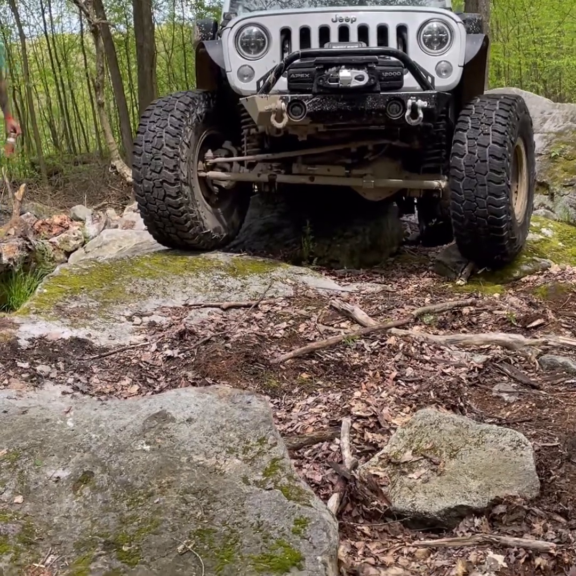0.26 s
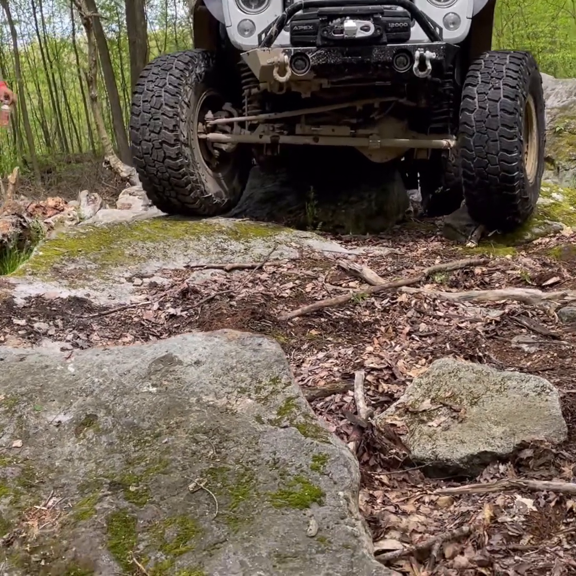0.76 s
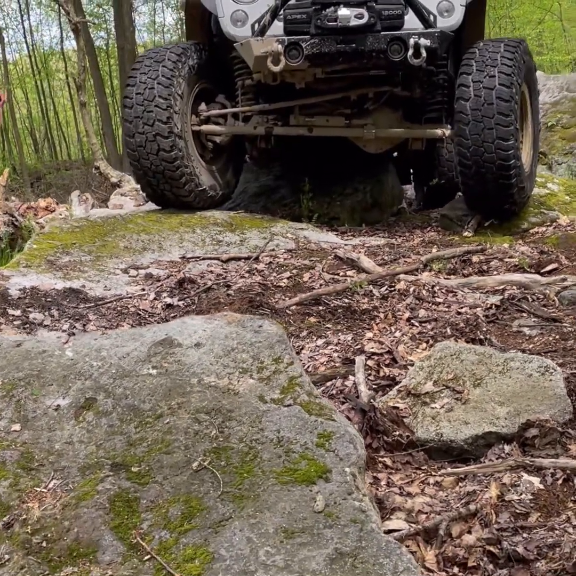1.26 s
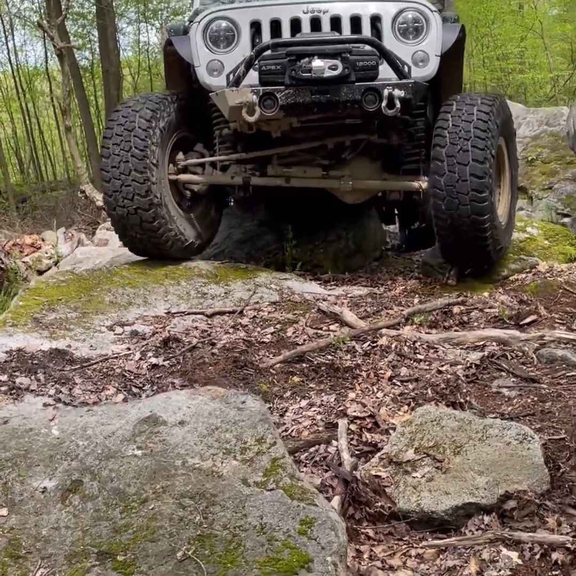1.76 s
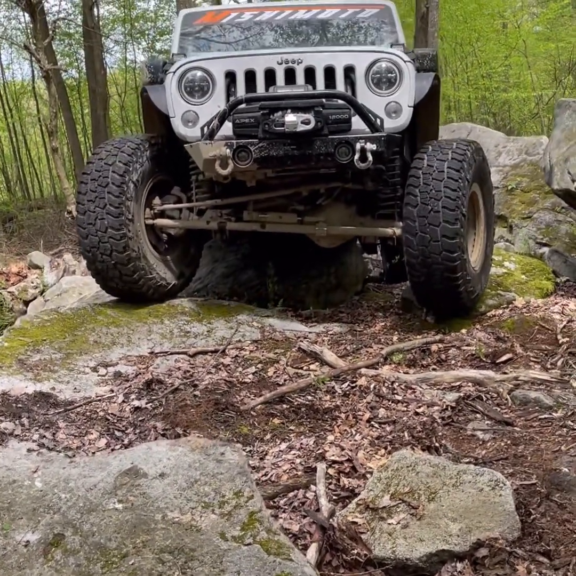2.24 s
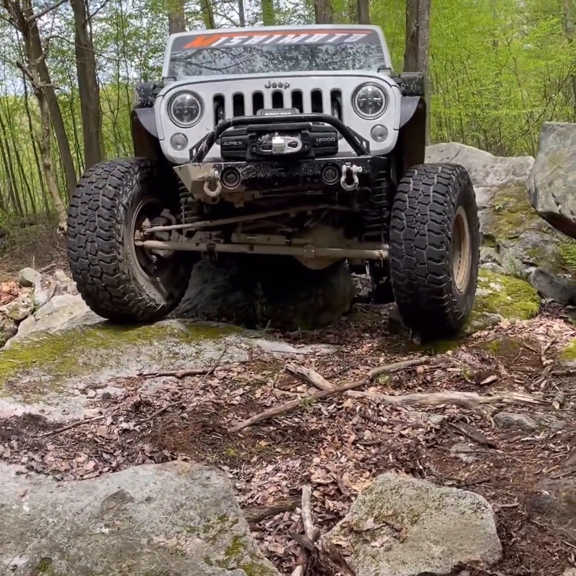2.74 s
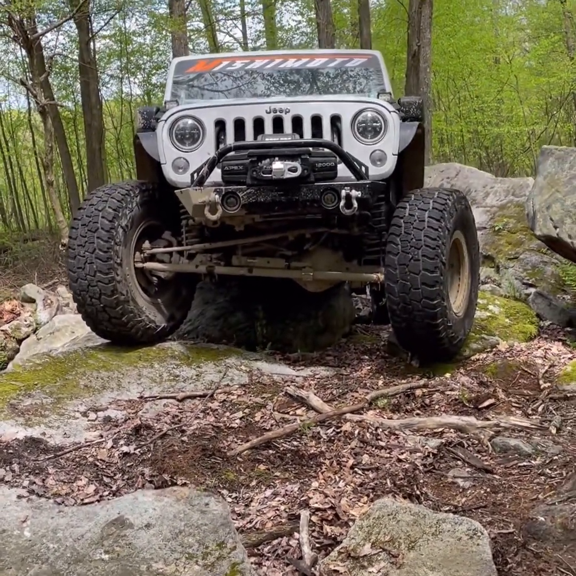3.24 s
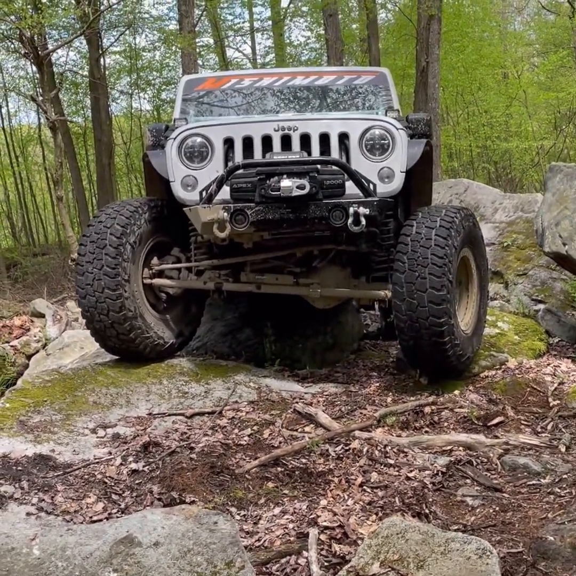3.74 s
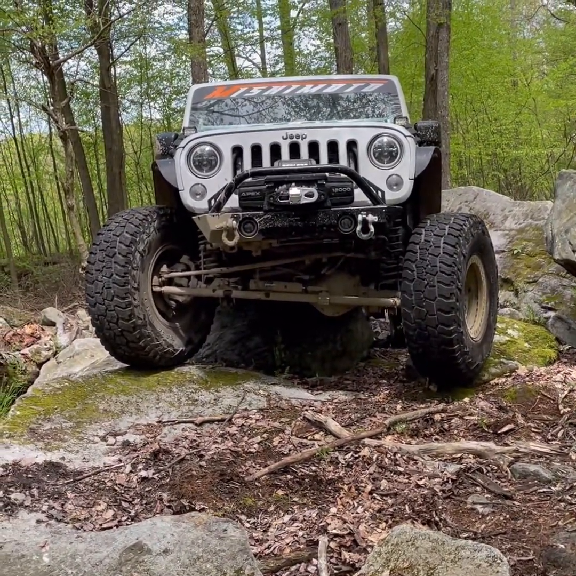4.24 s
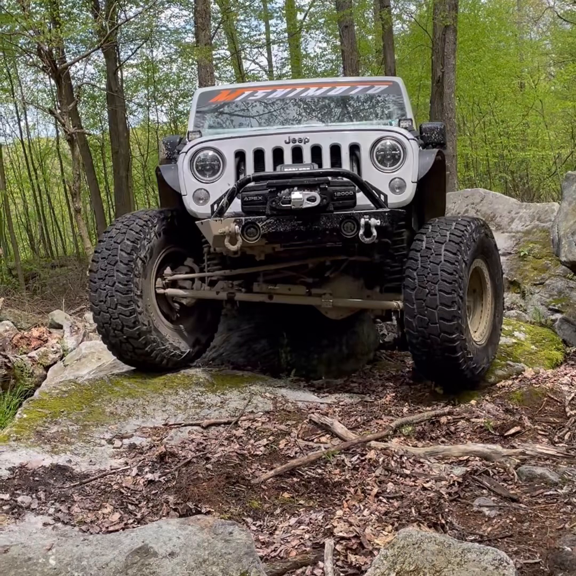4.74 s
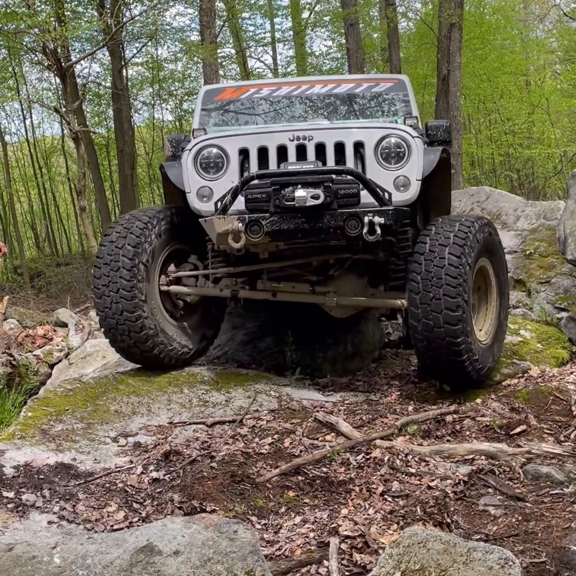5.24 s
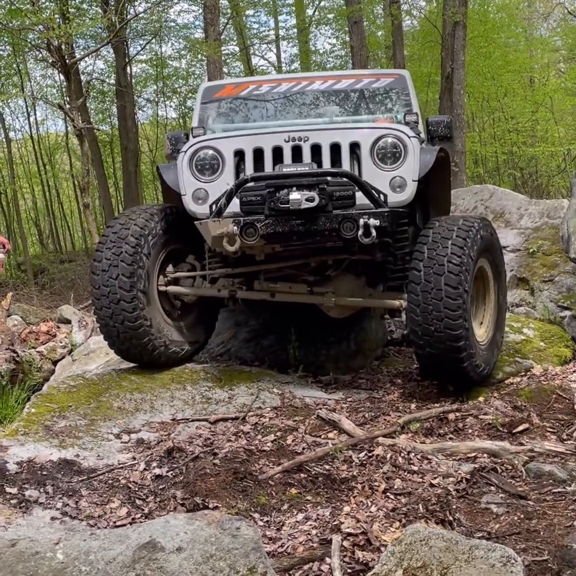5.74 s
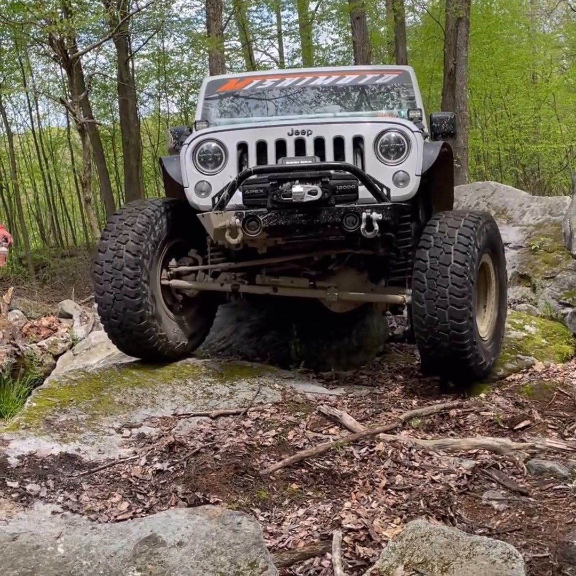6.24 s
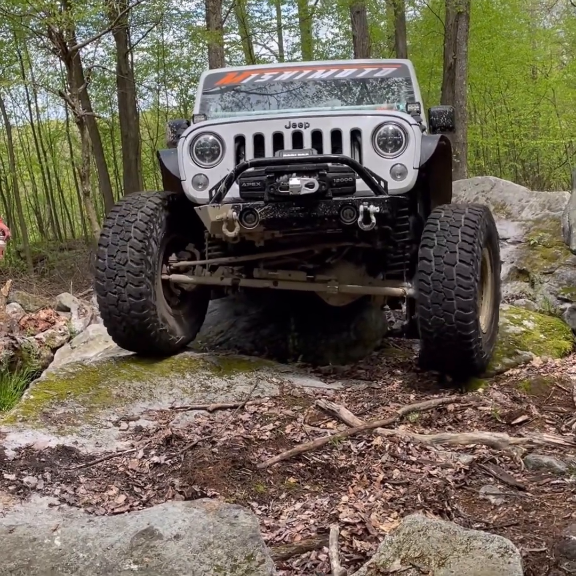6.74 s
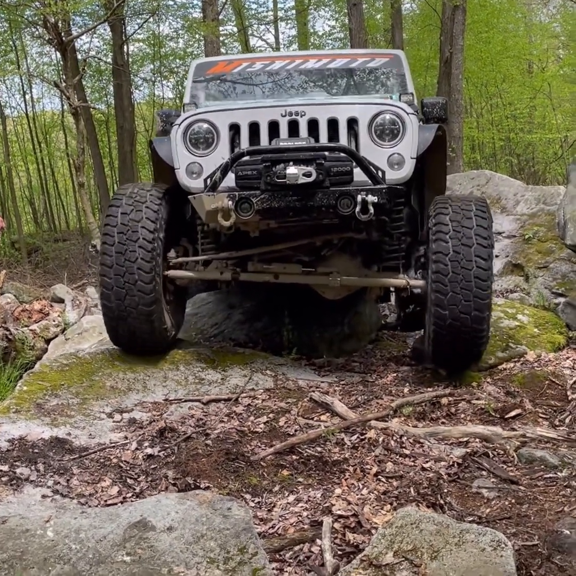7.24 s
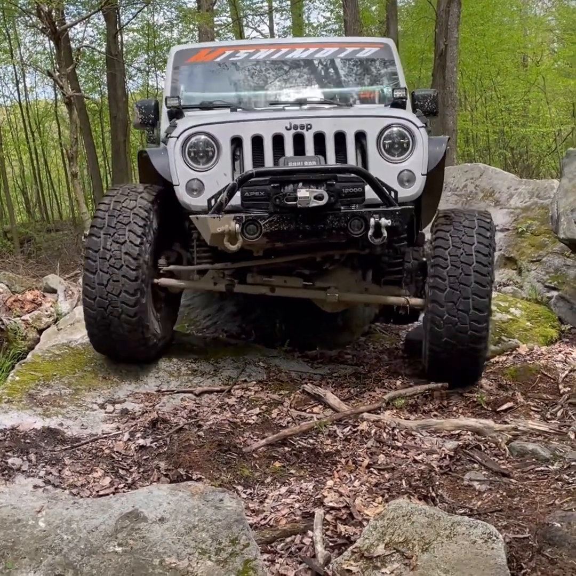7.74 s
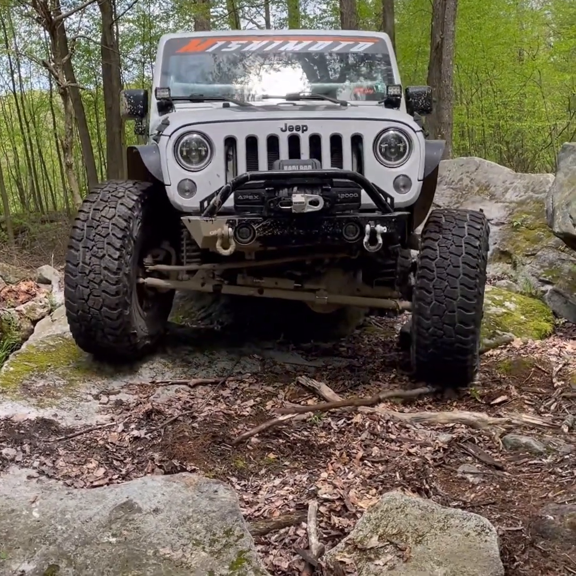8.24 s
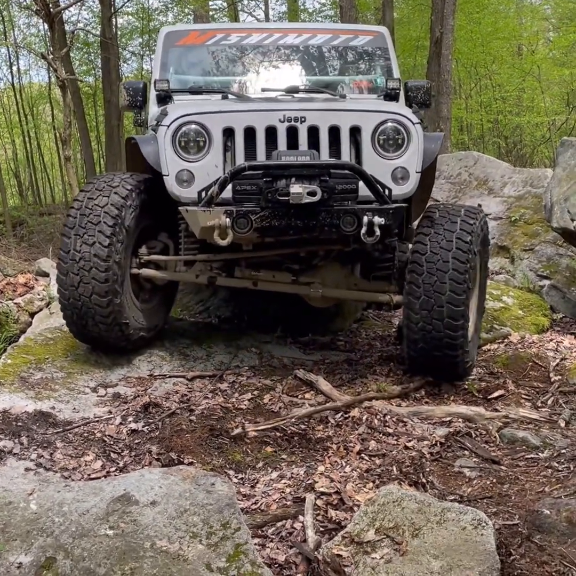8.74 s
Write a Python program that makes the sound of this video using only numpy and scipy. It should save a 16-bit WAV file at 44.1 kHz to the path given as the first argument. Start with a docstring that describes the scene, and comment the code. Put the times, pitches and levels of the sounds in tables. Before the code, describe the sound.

A low, throbbing engine with whirring fan and light clatter runs throughout, heard in the open with only a thin scattered tail from trees and rocks. Braking comes first: hollow groans, gritty rasps, sharp squeals. Dull tyre thuds cluster in the middle. Later the throttle surges, tyres scrape in quick pulses and pop off the slab, twigs snap, and rubber creaks.

```python
"""An off-road vehicle's six-cylinder engine works from just above idle as it crawls over rock slabs on a leafy trail.
The engine is sines at multiples of the firing rate, gas puffs, clattering panels and a cooling fan's two tones.
Dragging brakes are rough friction noise in resonances, and their squeals are short gliding tones.
Tyres and axles thud as struck modes; tread blocks scuff and pop on stone, and late on the rubber creaks.
Leaves and twigs crackle as random grains; trees and rocks add a thin scattered tail."""
import sys
import numpy as np
from scipy import signal
from scipy.fft import rfft, irfft
from scipy.io import wavfile
from scipy.ndimage import uniform_filter1d

SR = 44100
rng = np.random.default_rng(int(sys.argv[2]) if len(sys.argv) > 2 else 0)


def store_wav(level_fs):
    """Save 16-bit WAV to argv[1]."""
    pcm = np.round(np.clip(np.atleast_2d(level_fs), -1, 1) * 32767)
    wavfile.write(sys.argv[1], SR, pcm.T.astype(np.int16))


N = 396018
TIME = np.arange(N) / SR
FREQS = np.arange(N // 2 + 1) * SR / N

# spectrum of tread rubber and grit on stone: (frequency [Hz], relative level [dB])
SCUFF_COLOUR = [(160, 1), (300, 8), (450, 4.5), (560, 3.5), (760, -1.5), (950, 7), (1200, -6), (1600, -2.5),
                (2200, -17.5), (3500, -18), (5000, -25), (9000, -63)]


def from_db(db):
    """Decibels to gain."""
    return 10 ** (np.asarray(db) / 20)


def rms_one(x):
    """Scale to unit power."""
    return x / np.sqrt(np.mean(x ** 2) + 1e-20)


def in_time(rows):
    """Each column of a curve table at every sample."""
    s, *columns = np.transpose(rows)
    return [np.interp(TIME, s, column) for column in columns]


def at_hz(points):
    """Read a table over log frequency at every spectral bin."""
    hz, value = np.transpose(points)
    return np.interp(np.log(np.maximum(FREQS, 1)), np.log(hz), value)


def coloured(x, spectrum):
    """Give x a spectrum that falls away steeply beyond its ends, at unit power."""
    low_skirt = np.minimum(1, FREQS / spectrum[0][0]) ** 4
    high_skirt = np.maximum(1, FREQS / spectrum[-1][0]) ** 4
    return rms_one(irfft(rfft(x) * from_db(at_hz(spectrum)) * low_skirt / high_skirt, N))


def drift(rate):
    """Slow random wander of spread 1, made at a fortieth of the sample rate; a higher rate [Hz] wanders faster."""
    r = np.exp(-80 * np.pi * rate / SR)
    noise = rng.standard_normal(N // 40 + 2002)
    slow = signal.lfilter([1], [1, -2 * r, r * r], noise)[2000:]  # skip the filter's settling
    return np.interp(np.arange(N) / 40, np.arange(len(slow)), rms_one(slow))


def resonate(x, modes, wander_db=0):
    """Parallel resonances; each one's dB is its share of the power, and may swell and fade by itself."""
    out = 0
    for hz, width, db in modes:
        r = np.exp(-np.pi * width / SR)
        poles = [1, -2 * r * np.cos(2 * np.pi * hz / SR), r * r]
        ringing = signal.lfilter([1, 0, -1], poles, x + 1e-18)
        out = out + from_db(db + wander_db * drift(23)) * rms_one(ringing)
    return rms_one(out)


def grains(per_s, spread_db):
    """Random tiny contacts, mostly small and a few large."""
    sizes = from_db(spread_db * np.minimum(rng.exponential(1, N), 4)) * rng.choice([-1, 1], N)
    return rms_one(sizes * (rng.random(N) < per_s / SR))


def held(start, length, rise, fall):
    """Attack, hold and release."""
    age = np.maximum(TIME - start, 0)
    release = np.exp(-np.minimum(np.maximum(age - length, 0) / fall, 20))
    return (1 - np.exp(-age / rise)) * release


def swell(s, half, squareness=2.04):
    """A rise, a short hold and a fall around one moment."""
    return np.exp(-.5 * np.minimum(np.abs(TIME - s) / half, 4) ** squareness)


def near(hz, centre_hz, width_hz):
    """Gain of a resonance for a tone passing through it."""
    return 1 / np.hypot(1, 2 * (hz - centre_hz) / width_hz)


def damped(age, hz, t60, db):
    """One struck mode dying away by 60 dB in t60 seconds."""
    return from_db(db - 60 * age / t60) * np.sin(2 * np.pi * hz * age)


def slips(per_s, uneven):
    """Stick and slip: an uneven train of unit clicks."""
    rate = per_s * np.exp(uneven * drift(90))
    return np.diff(np.floor(np.cumsum(rate) / SR), prepend=0)


def engine_load():
    """Each press builds quickly, sags as the engine catches up, and dies away once the pedal is lifted."""
    # presses of the throttle: (start [s], length [s], firing-note level before the sag [dB])
    presses = [(0.505, 0.3, -45), (1.965, 0.41, -20.5), (2.8, 1.5, -37), (4.7, 0.66, -46),
               (5.495, 0.25, -19.5), (7.09, 0.31, -17.5), (7.95, 0.81, -29)]
    rise_s, sag_db_per_s, fall_db_per_s = 0.24, 3.5, 19.5
    load = from_db(-57)  # throttle closed
    for s, length, db in presses:
        age = np.maximum(TIME - s, 0)
        sag_db = sag_db_per_s * np.minimum(age, length)
        fall_db = fall_db_per_s * np.maximum(age - length, 0)
        load = load + from_db(db - sag_db - fall_db) * np.minimum(age / rise_s, 1) ** 2
    return load


def exhaust(turn, firing, drone_hz=122, drone_width_hz=42, pipe_hz=240, pipe_width_hz=35, rough=0.14):
    """Firing orders grow with load or drone as they cross pipe resonances; unequal banks add order 1.5."""
    # exhaust drone before its resonance: (time [s], level [dB])
    drone_curve = [(0, -44), (.45, -39.5), (.85, -30.5), (.95, -37.5), (1.24, -43), (1.3, -54), (2.0, -43),
                   (2.2, -35.5), (2.8, -43), (3.55, -35.5), (3.75, -40), (5.2, -37.5), (5.6, -35.5),
                   (6.5, -34), (6.8, -46), (7.1, -39), (7.28, -22.5), (7.55, -41), (8.06, -51),
                   (8.25, -35.5), (8.6, -30), (8.85, -39), (8.98, -42)]
    # the engine lopes as it labours against a ledge: (start [s], length [s], level of order 1.5 [dB])
    lopes = [(4.683, 0.82, -29)]
    first = engine_load()
    drone = from_db(in_time(drone_curve)[0])
    banks = from_db(-50)
    for s, length, db in lopes:
        banks = banks + from_db(db) * held(s, length, rise=0.032, fall=0.044)
    second = drone * near(2 * firing, drone_hz, drone_width_hz) ** 2 + from_db(-22) * first
    third = drone * near(3 * firing, drone_hz, drone_width_hz) ** 2
    out = 0
    for order, gain in ((1, first), (3 / 2, banks), (2, second), (3, third)):
        out = out + gain * (1 + rough * drift(3.7)) * np.sin(2 * np.pi * order * turn)
    for order in range(4, 8):
        pipe = from_db(-15) * near(order * firing, pipe_hz, pipe_width_hz)
        gain = first * pipe * (4 / order) ** 3
        out = out + gain * (1 + rough * drift(4.8)) * np.sin(2 * np.pi * order * turn)
    return np.sqrt(2) * out


def chug(turn, gain_db=-33):
    """Every firing sends a short puff of gas down the pipe, stronger under load."""
    gate = rms_one(np.exp(2 * np.cos(2 * np.pi * turn)))
    # (frequency [Hz], relative level [dB])
    gas = coloured(rng.standard_normal(N), [(110, 13), (250, 2.5), (450, -2), (900, -10)])
    return from_db(gain_db) * np.sqrt(engine_load()) * gate * gas


def fan(blade_hz=201.5, waver=0.002):
    """The electric cooling fan's blade tone and its fluttering octave."""
    # (time [s], blade tone level [dB RMS], octave level [dB RMS])
    fan_levels = [(0, -42, -55), (.6, -44.5, -51.5), (1.3, -53, -55), (2.0, -44, -46.5),
                  (2.8, -41.5, -47.5), (4.5, -41, -51), (6.3, -41.5, -48.5), (8.3, -39.5, -51),
                  (8.98, -39, -52)]
    tone_db, octave_db = in_time(fan_levels)
    phase = 2 * np.pi * np.cumsum(blade_hz * (1 + waver * drift(2.7))) / SR
    tone = from_db(tone_db) * np.sin(phase) * (1 + 0.042 * drift(15))
    octave = from_db(octave_db) * np.sin(2 * phase) * (1 + 0.37 * drift(15))
    return np.sqrt(2) * (tone + octave)


def engine_bay(turn, level_db=-41, air_db=-1, ring_db=-5, throb=0.26, flicker_db=0.82):
    """Fan air, and valve clatter that pulses with the firings and rings in the panels; both flicker slightly."""
    # spectrum of the air: (frequency [Hz], relative level [dB])
    air_colour = [(280, -6.5), (400, 1), (510, -6.5), (600, -7.5), (980, -5.5), (1500, -15.5), (2100, -17),
                  (3000, -19.5), (5000, -39), (6300, -22.5), (8000, -45), (15500, -41)]
    # panels and belts that ring: (frequency [Hz], width [Hz], relative level [dB])
    panel_modes = [(443, 146, 3.5), (467, 116, 6), (828, 27, -7.5), (927, 47, 1), (1391, 24, 0),
                   (2850, 100, -38)]
    pulse = 1 + throb * np.cos(2 * np.pi * turn)
    air = coloured(rng.standard_normal(N), air_colour)
    clatter = resonate(grains(2500, 3) * pulse, panel_modes)
    return from_db(level_db + flicker_db * drift(30)) * (from_db(air_db) * air + from_db(ring_db) * clatter)


def rolling():
    """Strength of the chassis rumble and of the leaf crackle: both rise with each lurch."""
    # short lurches of the wheels: (start [s], length [s], relative rumble level [dB], relative leaf level [dB])
    lurches = [(0.06, 0.33, -43, -51), (0.78, 0.68, -35.5, -56), (1.744, 1.02, -40, -51),
               (3.158, 1.7, -37.5, -71), (5.216, 0.25, -29, -43), (5.5, .38, -33, -50),
               (5.876, 0.42, -31, -49), (6.45, 0.85, -33.5, -46), (7.08, 0.88, -32.5, -42),
               (8.08, 0.94, -64, -45)]
    chassis, leaves = from_db(-41) ** 2, from_db(-52) ** 2  # creeping between the lurches
    for s, length, rumble_db, leaves_db in lurches:
        motion = held(s, length, rise=0.036, fall=0.18)
        chassis = chassis + (from_db(rumble_db) * motion) ** 2
        leaves = leaves + (from_db(leaves_db) * motion) ** 2
    return np.sqrt(chassis), np.sqrt(leaves)


def rumble(strength, gain_db=-2):
    """The chassis rumbles unevenly as it rolls."""
    # (frequency [Hz], relative level [dB])
    rumble_colour = [(25, -34), (40, 2.5), (80, 2.5), (150, -0.5), (200, -9), (290, -7.5), (420, -25.5)]
    lumps_db = 3 * np.tanh(drift(9.7))
    return strength * from_db(gain_db + lumps_db) * coloured(rng.standard_normal(N), rumble_colour)


def litter(strength, clump_db=1.4):
    """Dry leaves and grit crackle under the rolling tyres."""
    # (frequency [Hz], relative level [dB])
    litter_colour = [(900, 19), (2000, 12.5), (3500, 7.5), (5400, 7), (7000, -6), (8800, 0.5),
                     (12000, -4.5), (15500, -7)]
    return strength * from_db(clump_db * drift(3.8)) * coloured(grains(12000, 2.6), litter_colour)


def brakes(disc_db=-3.5, judder_db=-1.0):
    """Pads stick and slip: the hub groans, and on each of its swings the faces rasp and set the disc ringing."""
    # brake drags, levels at release: (start [s], length [s], groan [dB], rasp [dB], relative disc ring [dB])
    drags = [(-.02, 0.14, -39, -43, -37.5), (0.091, 0.053, -28, -41, -30.5),
             (0.157, 0.12, -27.5, -42, -34.5), (1.406, 0.21, -48, -46, -36), (1.496, 0.059, -27, -46, -41),
             (1.597, 0.12, -25.5, -36.5, -29.5), (1.719, 0.034, -33, -27.5, -28),
             (1.77, 0.2, -29, -48, -51), (1.996, 0.016, -42, -41, -51), (5.287, 0.16, -31, -52, -62),
             (7.68, 0.15, -32, -47.5, -49), (7.869, 0.091, -27, -62, -64)]
    # hub and knuckle: (frequency [Hz], width [Hz], relative level [dB])
    groan_modes = [(222.4, 5.9, -3.5), (246.1, 12, 2), (262.8, 9.1, -5), (436, 8.9, -10), (638, 12, -28)]
    # brake disc: (frequency [Hz], width [Hz], relative level [dB])
    disc_modes = [(1380, 60, -2.5), (1673, 24, 1.5), (1786, 25, 0.5), (1954, 22, -2), (2080, 31, -4),
                  (2183, 20, -2), (2500, 35, -1), (2660, 34, 2.5), (2784, 31, 5), (2965, 34, -0.5),
                  (3140, 40, -6), (3520, 42, 1), (3660, 40, -11), (3820, 40, -12), (4130, 42, -9),
                  (4230, 26, -1), (4700, 45, -11), (5050, 40, -5.5), (5300, 23, -18), (5460, 65, -13),
                  (5900, 80, -3), (6450, 70, -5)]
    # rasp of the faces: (frequency [Hz], relative level [dB])
    rasp_colour = [(500, 8), (1150, 9), (2000, 4), (2900, 7.5), (4400, -6), (6600, 0.5), (8500, -4.5),
                   (11000, -5), (15500, -18)]
    ease_db_per_s = 9  # each drag starts louder and eases until release
    bites = []
    for s, length, *_ in drags:
        ease = from_db(-ease_db_per_s * np.minimum(TIME - s - length, 0))
        bites.append(held(s, length, rise=0.021, fall=0.033) * ease)
    groaning, rasping, ringing = from_db(np.array(drags)[:, 2:]).T @ np.array(bites)
    hub = resonate(grains(600, 2.9), groan_modes)
    hub = hub / np.sqrt(uniform_filter1d(hub ** 2, size=3000) + 1e-9)  # friction holds the swing steady
    slip = np.maximum(1 + .6 * hub, 0)
    disc = resonate(slip * grains(9000, 3.3), disc_modes, wander_db=2)
    rasp = from_db(judder_db * drift(40)) * coloured(slip * grains(9000, 2.5), rasp_colour)
    return groaning * hub + rasping * rasp + from_db(disc_db) * ringing * disc


def squeal():
    """Brake friction catches on one mode, raggedly or as a firm gliding tone; a hard swing strengthens its octave."""
    # (start [s], length [s], level [dB], starting pitch [Hz], glide [Hz per s], roughness [0-1])
    squeals = [(0.151, 0.038, -35, 2640, 198, 0.75), (0.21, .1, -45, 3650, 303, 0.7),
               (0.821, 0.088, -41.5, 682, -250, 0.25), (1.425, 0.266, -41.5, 4930, 140, .7),
               (1.53, 0.14, -37, 3000, -100, 0.54), (1.633, 0.045, -29.5, 3490, -400, 0.18),
               (1.603, 0.067, -34, 2680, 2.5, 0.93), (1.686, 0.023, -22.5, 3026, -900, 0.09),
               (1.716, 0.027, -16, 2990, -1000, 0.09), (1.75, 0.026, -20.5, 2965, -1000, 0),
               (1.72, 0.018, -34, 2820, -1500, 0.84), (1.732, 0.018, -18.5, 2920, -2000, 0.66),
               (1.77, 0.067, -35, 652, 601.5, 0.88), (1.82, 0.061, -41, 2990, -100, 0.07),
               (7.95, 0.017, -27, 3530, 7, 0.56), (7.952, 0.026, -47, 3080, 3, 1)]
    out = 0
    for s, length, db, hz, glide, rough in squeals:
        waver_hz, chatter_db = 70 * drift(110), 6 * np.tanh(drift(80))
        phase = 2 * np.pi * np.cumsum(hz + glide * (TIME - s) + rough * waver_hz) / SR
        swing = from_db(db + rough * chatter_db) * held(s, length, rise=0.0046, fall=.005)
        out = out + swing * np.sin(phase) + swing ** 2 * np.sin(2 * phase)
    return out


def snaps(gain_db=-10, tear=0.0028, rise=0.0014):
    """A twig's fibres give way in a quick run of cracks."""
    # (time [s], relative level [dB], dying time [s])
    twig_snaps = [(0.848, -32, 0.039), (1.103, -30, 0.021), (2.252, -29, 0.013), (3.29, -32.5, 0.04),
                  (3.366, -31.5, 0.022), (3.674, -31.5, 0.046), (4.073, -29, .006), (4.258, -29.5, 0.073),
                  (5.281, -18, 0.0069), (6.723, -27.5, 0.032), (7.34, -18, 0.0091), (8.0548, -18, 0.014),
                  (8.334, -21, 0.0091)]
    # (frequency [Hz], relative level [dB])
    snap_colour = [(700, 14), (1150, 10), (1420, 24.5), (1650, 15), (1950, 18.5), (2350, 15), (3200, 15),
                   (4500, 10.5), (6500, 3.5), (12000, -17)]
    force = np.zeros(N)
    age = TIME[:SR // 4]
    for s, db, fall in twig_snaps:
        start = round(s * SR)
        dying = np.exp(-np.maximum(age - tear, 0) / fall)
        force[start:start + len(age)] += from_db(db) * (1 - np.exp(-age / rise)) * dying
    return from_db(gain_db) * force * coloured(grains(7000, 0.6), snap_colour)


def thuds(t60=0.12, rise=0.0029, knock_db=-3):
    """A soft blow sets a tyre swinging for a few cycles, with a dull knock in the axle."""
    # (time [s], tyre level before decay [dB], tyre pitch [Hz], relative axle knock level [dB])
    blows = [(0.926, -20, 78, -32), (1.097, -32, 125, -18), (1.183, -19, 92, -13.5), (1.213, -34, 109, -20),
             (1.241, -21.5, 108, -17), (1.364, -37.5, 124, -19), (2.461, -12, 84, -19),
             (2.521, -9.5, 59.5, -34), (3.284, -16, 63, -32), (3.619, -15, 72, -28),
             (3.686, -12.5, 85, -22), (3.795, -15.5, 58.4, -38), (3.917, -15, 67, -31),
             (4.225, -12, 66, -12.5), (4.279, -13, 90, -18), (4.371, -23, 110, -18),
             (4.382, -12, 69.5, -30), (4.46, -17.5, 119, -16.5), (4.564, -19, 90, -32),
             (4.594, -15, 79, -30), (4.782, -8.5, 71, -23), (4.835, -14, 70.5, -36)]
    # axle: (frequency before a random shift [Hz], t60 [s], relative level [dB])
    axle_modes = [(161, 0.088, 0), (231, 0.062, -2), (340, 0.031, -2)]
    out, age = np.zeros(N), TIME[:SR // 3]
    for s, tyre_db, hz, axle_db in blows:
        blow = damped(age, hz, t60, tyre_db)
        for mode_hz, ring_s, db in axle_modes:
            shifted_hz = mode_hz * rng.uniform(0.8, 1.114)
            blow = blow + damped(age, shifted_hz, ring_s, db + axle_db + knock_db)
        out[round(s * SR):][:len(age)] += blow * (1 - np.exp(-age / rise))
    return out


def tread_ring(uneven_db=2.5):
    """The short ring of a tread block, a little different each time."""
    # (frequency [Hz], t60 [s], relative level before a random change [dB])
    tread_modes = [(430, 0.0093, -9.5), (950, 0.018, -9.5), (1130, 0.0036, -20.5), (1400, 0.0057, -18),
                   (1750, 0.0055, -31), (2250, 0.0069, -27)]
    age = TIME[:SR // 20]
    return sum(damped(age, hz, t60, db + uneven_db * rng.standard_normal()) for hz, t60, db in tread_modes)


def pops(grit_db=-13, grit_fall=0.0097):
    """A tread block snaps free, rings and flicks a little grit."""
    # (time [s], relative level [dB])
    releases = [(4.569, -20), (5.24, -28), (5.285, -16), (5.597, -22), (5.887, -18), (5.957, -18),
                (6.067, -14), (6.074, -12), (6.088, -14.5), (6.103, -12), (6.258, -15.5), (6.279, -15.5),
                (6.291, -14), (6.412, -15.5), (6.482, -24), (6.499, -16), (6.61, -20), (6.674, -20),
                (6.915, -13.5), (7.276, -15), (7.441, -30), (7.466, -16.5), (7.48, -18)]
    out, grit = np.zeros(N), coloured(grains(1900, 0.96), SCUFF_COLOUR)
    for s, db in releases:
        ring = tread_ring()
        span = slice(round(s * SR), round(s * SR) + len(ring))
        flick = from_db(grit_db) * grit[span] * np.exp(-TIME[:len(ring)] / grit_fall)
        out[span] += from_db(db) * (ring + flick)
    return out


def scuffs(gain_db=-18, grind_db=-4, jerk_db=-1.0, chatter_db=3.0, uneven_db=4):
    """Each tread block slides for a moment, catching in small jerks and grinding grit on the slab."""
    # slides, about five a second: (middle [s], relative level [dB], half length [s])
    slides = [(5.306, -13.5, 0.053), (5.56, -15, 0.052), (5.993, -21.5, 0.037), (6.102, -13, 0.038),
              (6.282, -10.5, 0.038), (6.489, -9.5, 0.037), (6.673, -14.5, 0.057), (6.892, -13, 0.039),
              (7.093, -17.5, 0.063), (7.25, -16.5, 0.028), (7.458, -8.5, 0.029), (7.59, -15.5, .025),
              (7.83, -23, 0.047)]
    pressure = sum(from_db(db) * swell(s, half) for s, db, half in slides)
    grind = from_db(chatter_db * drift(43)) * coloured(grains(1500, 2.4), SCUFF_COLOUR)
    sizes = from_db(uneven_db * np.clip(rng.standard_normal(N), -2, 2))
    catches = slips(per_s=210, uneven=.6) * sizes
    jerks = rms_one(signal.fftconvolve(catches, tread_ring())[:N])
    return from_db(gain_db) * pressure * (from_db(grind_db) * grind + from_db(jerk_db) * jerks)


def creak(tone_db=-1, wheel_db=2, chatter_db=2.0, waver_hz=35):
    """Rubber sticks and slips on the slab: a rough tone sinks as the tyre twists, and the wheel rings along."""
    # (time [s], resonance [Hz], relative level [dB])
    creak_curve = [(7.68, 1560, -60), (7.72, 1554, -50), (7.79, 1550, -40), (7.815, 1526, -34),
                   (7.85, 1420, -44), (7.9, 1404, -48), (7.945, 1374, -38.5), (7.975, 1405, -42),
                   (8.01, 1424, -57)]
    # the wheel under the creak: (frequency [Hz], width [Hz], relative level [dB])
    wheel_modes = [(504, 150, 4), (1010, 39, 5), (1990, 35, -7), (2350, 29, -14.5), (3250, 31, -8)]
    hz, level_db = in_time(creak_curve)
    tone = np.sqrt(2) * np.sin(2 * np.pi * np.cumsum(hz + waver_hz * drift(105)) / SR)
    wheel = resonate(slips(per_s=300, uneven=.6) * rng.standard_normal(N), wheel_modes)
    sounding = (TIME > creak_curve[0][0]) & (TIME < creak_curve[-1][0])
    level = from_db(level_db + chatter_db * drift(50))
    return sounding * level * (from_db(tone_db) * tone + from_db(wheel_db) * wheel)


def forest(x, wet_db, t60, gap=0.00027, lowest_hz=380):
    """Trunks and rocks scatter a thin tail, different at each ear."""
    age = TIME[:SR]
    tail = rng.standard_normal((2, SR)) * from_db(-60 * age / t60) * (1 - np.exp(-age / gap))
    tail = tail / np.sqrt(np.sum(tail ** 2, axis=1, keepdims=True))
    high_pass = signal.butter(2, lowest_hz, "high", fs=SR, output="sos")
    scattered = signal.sosfilt(high_pass, x)  # long waves pass the trunks
    return from_db(wet_db) * signal.fftconvolve(scattered[None], tail, axes=1)[:, :N]


def microphone_pair(x):
    """Two ports hear the same sound with a shift of level, and of phase that grows in the treble."""
    # (frequency [Hz], left minus right level [dB])
    port_balance = [(270, 0), (450, 1), (740, 4), (1220, 3), (2010, 1), (3330, -1.5), (5500, -.5),
                    (9000, 0)]
    # (frequency [Hz], phase by which left leads [radians])
    port_phase = [(60, .05), (400, .1), (650, .45), (850, -.2), (1150, .25), (1400, -.15), (1950, .05),
                  (2400, .75), (3200, .2), (4400, .8), (4800, 0), (5500, .1), (7100, 3.1), (8300, 3.2),
                  (10300, 6.2), (12000, 6.4), (13300, 9.3), (15500, 9.6)]
    shift = from_db(at_hz(port_balance) / 2) * np.exp(.5j * at_hz(port_phase))
    centre = rfft(x)
    return np.array([irfft(centre * shift, N), irfft(centre / shift, N)])


def scene():
    """The vehicle ahead among the trees; engine and leaves scatter in a longer, fainter tail than the wheels."""
    # engine speed: (time [s], firing rate [Hz])
    firing_curve = [(0, 38.9), (.8, 40.5), (1.35, 39.2), (2.0, 39.3), (2.24, 49.5), (2.55, 51.8),
                    (3.3, 40.6), (4.0, 39.6), (4.75, 42.3), (5.55, 39.6), (5.76, 49.8), (6.17, 42.6),
                    (6.58, 40), (7.1, 36.8), (7.33, 51), (7.42, 55), (7.53, 56.4), (7.88, 55.3),
                    (8.3, 60.4), (8.65, 60.2), (8.98, 55.3)]
    firing, = in_time(firing_curve)
    turn = np.cumsum(firing) / SR  # counts firings
    chassis, leaves = rolling()
    motor = exhaust(turn, firing) + chug(turn) + fan() + engine_bay(turn)
    ground = litter(leaves)
    wheels = rumble(chassis) + brakes() + squeal() + snaps() + thuds() + pops() + scuffs() + creak()
    surroundings = forest(motor + ground, wet_db=-13.5, t60=0.091) + forest(wheels, wet_db=-11.5, t60=0.04)
    return microphone_pair(motor + wheels + ground) + surroundings


def record(dry, bass_cut_hz=39, top_cut_hz=15800):
    """The deepest bass and the top are cut."""
    steep = (FREQS / bass_cut_hz) ** 4
    lean = irfft(rfft(dry) * steep / np.hypot(1, steep), N)
    low_pass = signal.ellip(10, .1, 80, top_cut_hz, fs=SR, output="sos")
    return signal.sosfilt(low_pass, lean)


dry = scene()
out = record(dry)
store_wav(out)
```